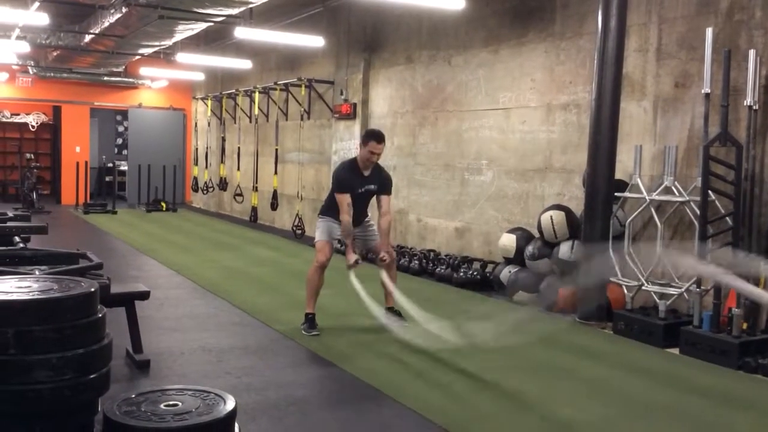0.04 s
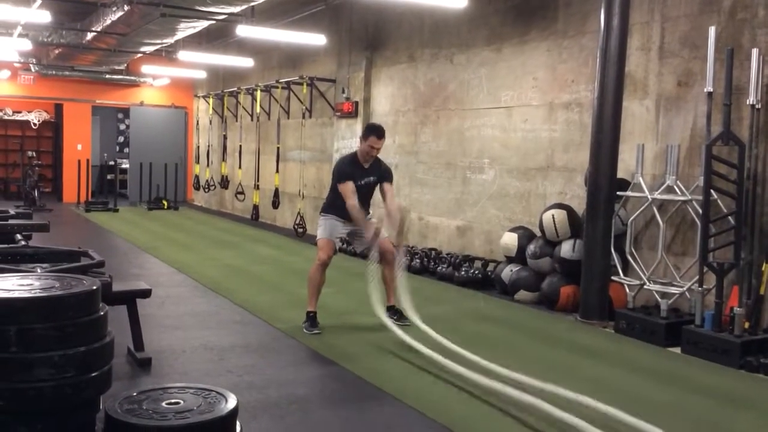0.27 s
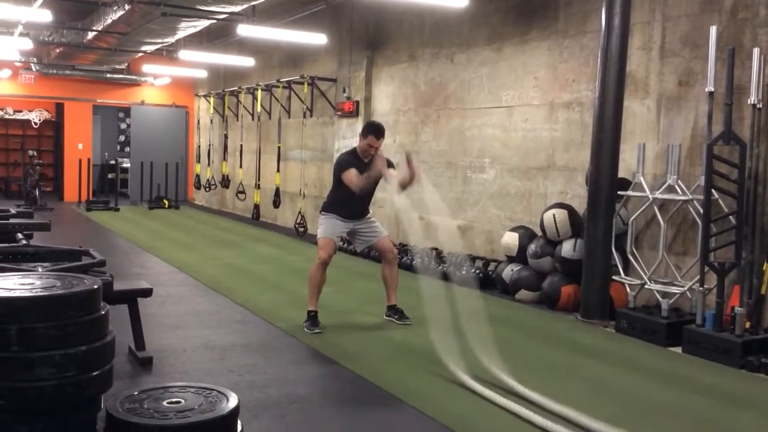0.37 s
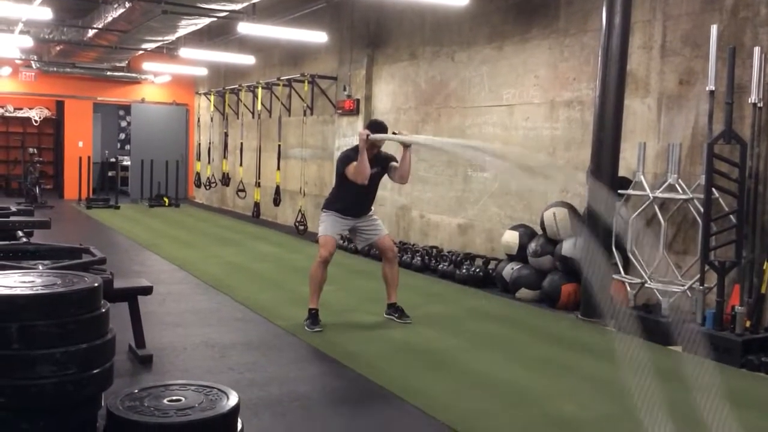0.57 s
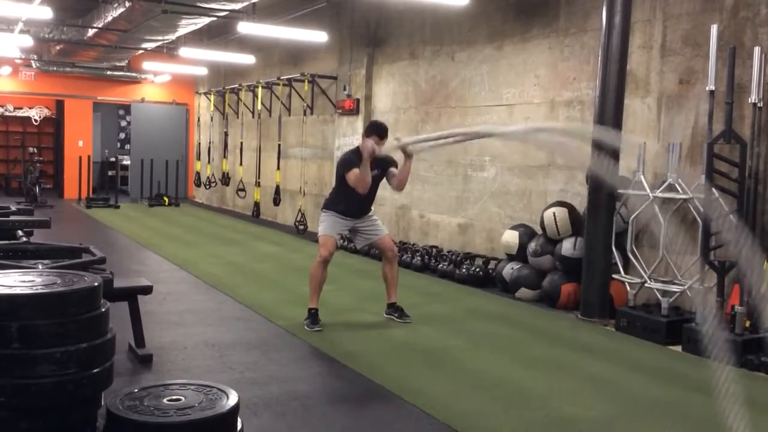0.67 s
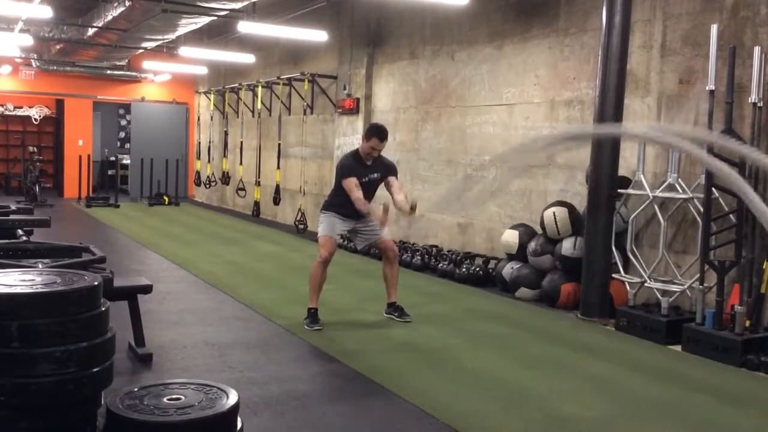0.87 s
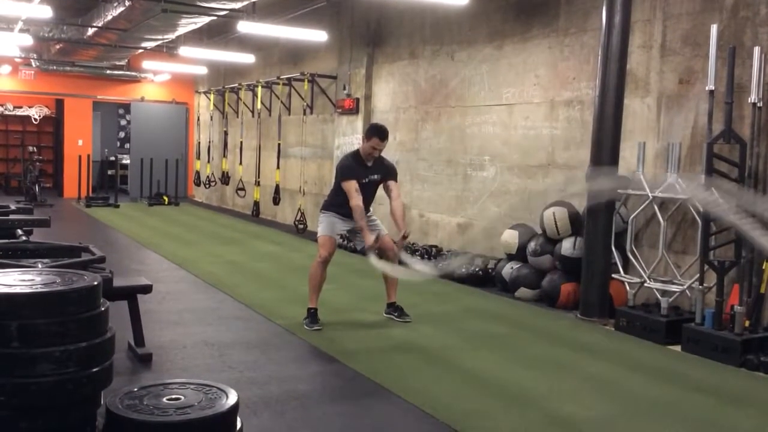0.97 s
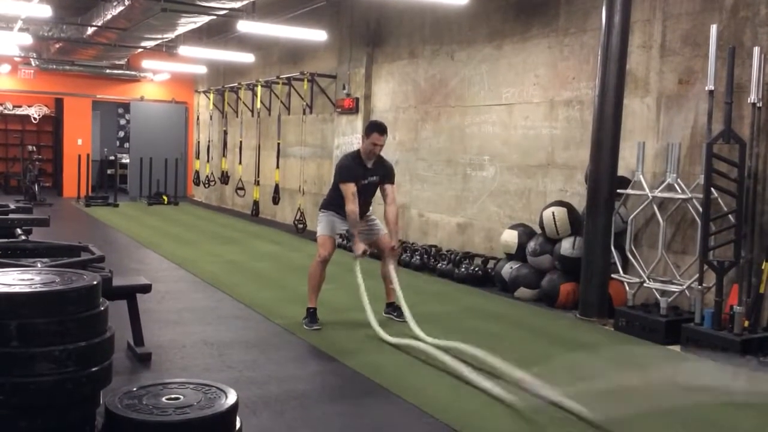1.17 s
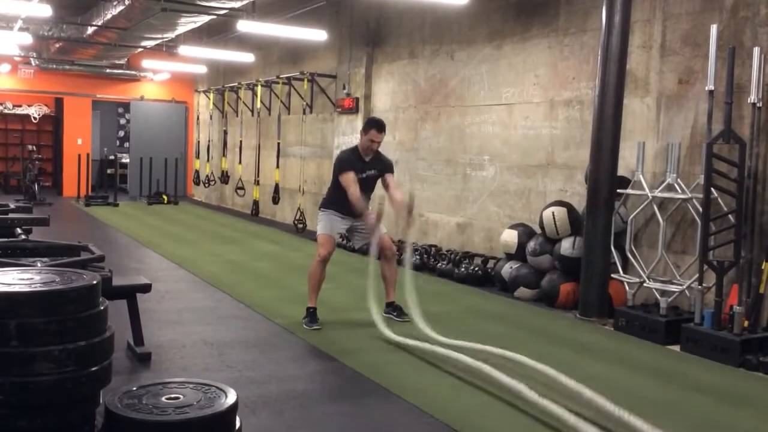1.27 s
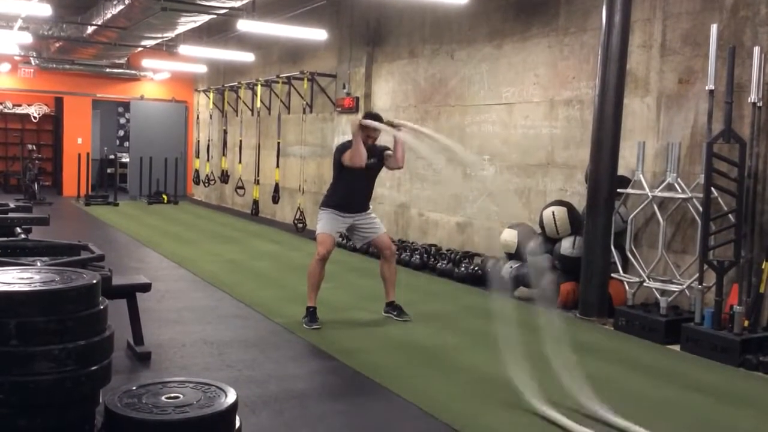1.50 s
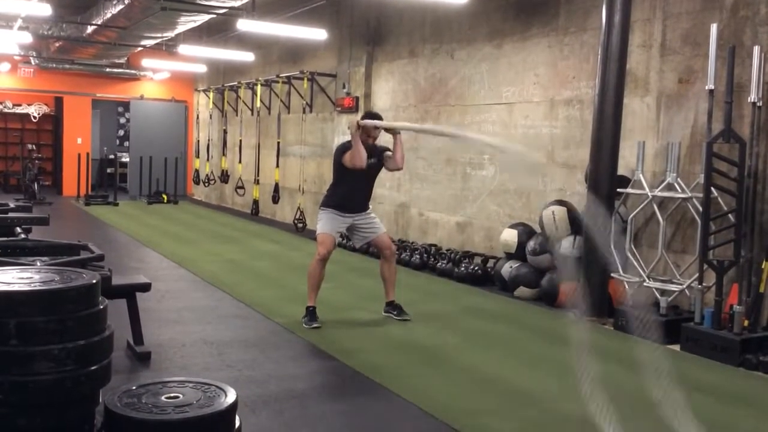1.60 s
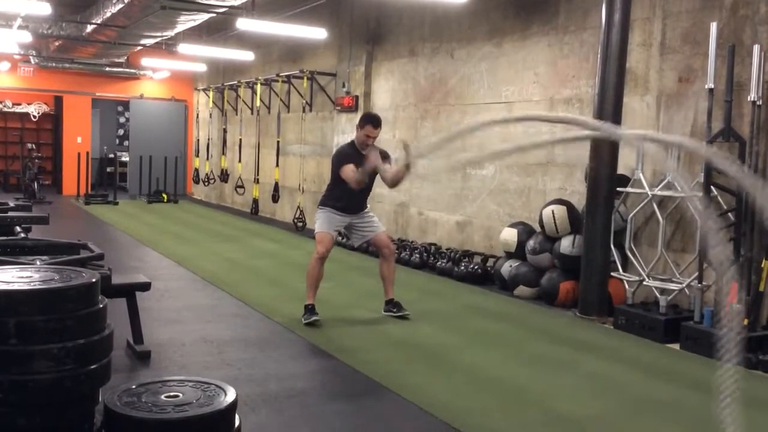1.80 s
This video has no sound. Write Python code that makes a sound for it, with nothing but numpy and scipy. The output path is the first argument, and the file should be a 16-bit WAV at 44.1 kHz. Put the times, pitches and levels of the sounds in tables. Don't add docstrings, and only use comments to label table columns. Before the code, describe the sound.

A pair of thick ropes hits a padded turf floor, drags and peels off with a rustling swish, then hits again; short hard-walled hall echo and faint rumble, heard by a phone microphone some metres off.

```python
import sys
import numpy as np
from scipy import signal
from scipy.fft import rfft, irfft
from scipy.io import wavfile
from scipy.ndimage import uniform_filter1d

SR = 44100
rng = np.random.default_rng(int(sys.argv[2]) if len(sys.argv) > 2 else 0)


def volts_from_decibels(level):
    exponent = np.asarray(level, float) / 20
    return 10 ** exponent


def to_wav(s):
    ch = np.atleast_2d(s).T
    pcm = np.round(np.clip(ch, -1, 1) * 32767)
    wavfile.write(sys.argv[1], SR, pcm.astype(np.int16))


N = 81585
OCTAVES_HZ = 28 * 2. ** np.arange(10)


def read_curve(points, hz):
    p = np.array(points, float)
    return np.interp(np.log(np.maximum(hz, 1)), np.log(p[:, 0]), p[:, 1])


def colour(x, points):
    size = 4096
    gain = volts_from_decibels(read_curve(points, np.fft.rfftfreq(size, 1 / SR)))
    cepstrum = irfft(np.log(gain))
    cepstrum[1:size // 2] *= 2
    cepstrum[size // 2 + 1:] = 0
    h = irfft(np.exp(rfft(cepstrum)))[:size // 2]
    return signal.fftconvolve(x, h / np.sqrt(np.sum(h ** 2)))[:len(x)]


def band(x, hz, octaves):
    low_hz = hz * 2 ** (-octaves / 2)
    high_hz = min(hz * 2 ** (octaves / 2), SR * 9 / 20)
    return signal.sosfilt(signal.butter(2, [low_hz, high_hz], "band", fs=SR, output="sos"), x)


def grains(per_s, scatter_db):
    chance, sign, size = rng.random((3, N))
    x = (chance < per_s / SR) * np.sign(sign - .5) * volts_from_decibels(-scatter_db * np.log(1 - size))
    return x / np.sqrt(np.mean(x ** 2))


def walk(rate_hz):
    hold = int(SR / rate_hz)
    steps = rng.standard_normal(N)[np.arange(N) // hold]
    return 0.77 * uniform_filter1d(uniform_filter1d(steps, hold), hold)


def hall():
    level_db, flicker_db = -53, -1.5
    # hz, density_db
    rumble = [(25, -29), (45, -3.5), (120, -2), (190, -6), (290, -10.5), (430, -21), (3000, -35),
              (15000, -66)]
    out = np.zeros(N)
    for hz in OCTAVES_HZ:
        noise = band(colour(rng.standard_normal(N), rumble), hz, 1)
        out += volts_from_decibels(flicker_db * walk(7.9)) * noise
    return volts_from_decibels(level_db) * out


def room(x, t):
    level_db, delay_s = -11.5, 0.027
    # band_hz, t60_s
    decays = [(125, 1.74), (350, 1.075), (1000, 0.72), (2800, 0.47), (8000, 0.62)]
    u = np.maximum(t - delay_s, 0)
    tail = np.zeros(N)
    for hz, t60_s in decays:
        tail += band(rng.standard_normal(N), hz, 1.71) * volts_from_decibels(-60 * u / t60_s)
    tail *= np.clip(t / delay_s, 0, 1) ** 2
    return signal.fftconvolve(x, tail / np.sqrt(np.sum(tail ** 2)))[:N] * volts_from_decibels(level_db)


def falls(t):
    # start_s, level_db, rise_s, length_s
    drops = [
        (0.104, -63.5, 0.038, 0.14),
        (1.151, -65.5, 0.068, 0.15),
    ]
    # hz, density_db
    air = [(800, -6), (2500, 7), (5000, -4), (9000, -6), (15000, -9)]
    gain = np.zeros(N)
    for start_s, level_db, rise_s, length_s in drops:
        rise = np.clip((t - start_s) / rise_s, 0, 1)
        gain += volts_from_decibels(level_db) * rise * volts_from_decibels(-200 * np.maximum(t - start_s - length_s, 0))
    return gain * colour(rng.standard_normal(N), air)


def brush(t):
    level_db, flicker_db, octave_flicker_db = 10.5, -0.6, 0.37
    bristles_per_s, scatter_db = 9000, 1
    # time_s, level_db
    slide = np.array([(0, -78), (.06, -84.5), (.2, -75), (.40, -68), (.485, -70.5), (.53, -66.5),
                      (.61, -60), (.72, -59.5), (.8, -62.5), (.96, -67.5), (1.05, -72), (1.135, -81.5),
                      (1.4, -91), (1.5, -80), (1.585, -64.5), (1.701, -63.5), (1.76, -67.5), (1.85, -75.5)])
    # start_s, level_db, swell_s, t60_s
    crushes = [
        (0.207, -54.5, 0.066, 0.35),
        (1.249, -55, 0.063, 0.64),
    ]
    # hz, density_db
    turf = [(600, -18.5), (1500, -4.5), (2600, 0.5), (3600, -2.5), (5500, -13), (6800, -17.5), (8500, -14),
            (15000, -23)]
    gain = volts_from_decibels(np.interp(t, slide[:, 0], slide[:, 1]))
    for start_s, crush_db, swell_s, t60_s in crushes:
        swell = np.clip((t - start_s) / swell_s, 0, 1) ** .45
        gain = gain + volts_from_decibels(crush_db) * swell * volts_from_decibels(-60 * np.maximum(t - start_s - swell_s, 0) / t60_s)
    shared_db = level_db + flicker_db * walk(11.35)
    out = np.zeros(N)
    for hz in OCTAVES_HZ[4:]:
        bristles = band(colour(grains(bristles_per_s, scatter_db), turf), hz, 1)
        out += volts_from_decibels(shared_db + octave_flicker_db * walk(22)) * bristles
    return gain * out


def thuds(t):
    # start_s, peak_db, pitch_hz, rise_s, t60_s
    landings = [(.2035, -26.5, 194, .003, 0.033), (.2095, -21.5, 260, .0015, 0.015),
                (.270, -28.5, 169, 0.0052, 0.048), (0.2972, -28.5, 178.6, 0.0074, 0.073),
                (0.318, -27.5, 164, 0.01, 0.074), (.364, -43, 650, 0.0075, 0.077),
                (0.376, -30.5, 182, 0.0071, 0.087), (.435, -45.5, 324, 0.0099, 0.054),
                (.50, -41, 114.3, 0.017, 0.11), (.67, -44, 113.2, 0.03, .15),
                (.895, -51.5, 64.7, 0.016, 0.21), (.955, -45.5, 143, 0.019, 0.12),
                (1.2495, -26, 190, 0.0032, 0.028), (1.2565, -24, 262, .002, 0.013),
                (1.302, -33, 633, 0.006, 0.014), (1.3465, -30, 193, 0.0064, 0.051),
                (1.367, -29, 150.3, 0.0029, 0.072), (1.425, -35, 167, .01, 0.075),
                (1.568, -39, 172.8, 0.018, 0.25), (1.819, -49, 90, 0.0061, 0.21),
                (0.083, -44, 146.6, .015, .2), (1.415, -37.5, 335, 0.0052, 0.027),
                (1.695, -43.5, 132, .01, 0.19), (1.785, -44, 114, 0.004, 0.11)]
    out = np.zeros(N)
    for start_s, peak_db, pitch_hz, rise_s, t60_s in landings:
        u = np.maximum(t - start_s, 0)
        rise = np.sin(np.pi / 2 * np.minimum(u / rise_s, 1)) ** 2
        env = rise * volts_from_decibels(-60 * np.maximum(u - rise_s, 0) / t60_s)
        out += volts_from_decibels(peak_db) * env * np.sin(2 * np.pi * pitch_hz * u)
    return out


def slaps(t):
    slaps_per_s, scatter_db = 2700, 2.2
    attack_s, treble_fade_ratio = 0.0025, 0.79
    body_db, body_octaves = -5, 0.39
    # start_s, level_db, lay_s, t60_s, body_hz
    slams = [
        (0.2105, -34.5, 0.027, 0.49, 985),
        (1.2498, -40, .004, 0.15, 398),
        (1.257, -39.5, 0.064, 0.48, 614),
        (1.346, -47, 0.014, 0.3, 500),
    ]
    # hz, density_db
    rope = [(120, -17), (250, 1.5), (450, 0.5), (700, -7), (1050, -5.5), (1800, -9.5), (4200, -18),
            (7000, -32.5)]
    octaves = []
    for hz in 160 * 2. ** np.arange(6):
        octaves.append(band(colour(grains(slaps_per_s, scatter_db), rope), hz, 1))
    low, high = sum(octaves[:3]), sum(octaves[3:])
    out = np.zeros(N)
    for start_s, level_db, lay_s, t60_s, body_hz in slams:
        body = band(grains(slaps_per_s, scatter_db), body_hz, body_octaves)
        body = volts_from_decibels(body_db) * body / np.std(body)
        rise = np.clip((t - start_s) / attack_s, 0, 1) * volts_from_decibels(level_db)
        after = np.maximum(t - start_s - lay_s, 0)
        low_fade = volts_from_decibels(-60 * after / t60_s)
        high_fade = volts_from_decibels(-60 * after / (t60_s * treble_fade_ratio))
        out += rise * (low * low_fade + (high + body) * high_fade)
    return out


def scene():
    t = np.arange(N) / SR
    slap, thud = slaps(t), thuds(t)
    ringing = room(slap + volts_from_decibels(-2) * thud, t)
    return (slap + thud + ringing + brush(t) + falls(t) + hall())[None]


def low_pass(x):
    return signal.sosfilt(signal.butter(12, 15990, fs=SR, output="sos"), x)


def record(dry):
    top_hz = 15330
    # hz, gain_db
    mic = [(11000, 0), (13000, 0), (14800, 3), (15300, 2)]
    hz = np.fft.rfftfreq(N, 1 / SR)
    response = volts_from_decibels(read_curve(mic, hz)) * (hz < top_hz)
    mix = irfft(rfft(dry) * response, N)
    return low_pass(mix)


dry = scene()
out = record(dry)
to_wav(out)
```